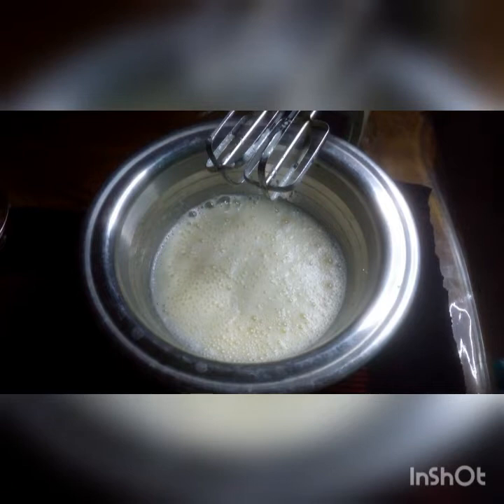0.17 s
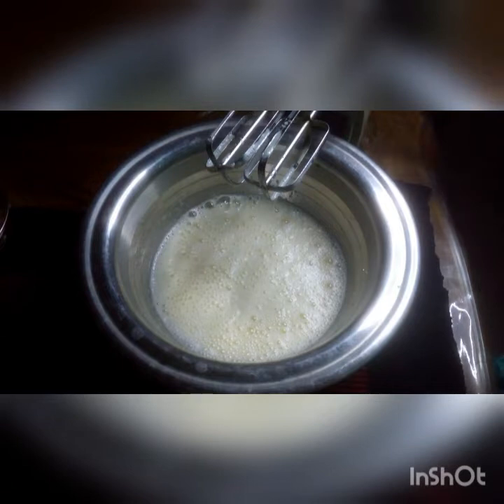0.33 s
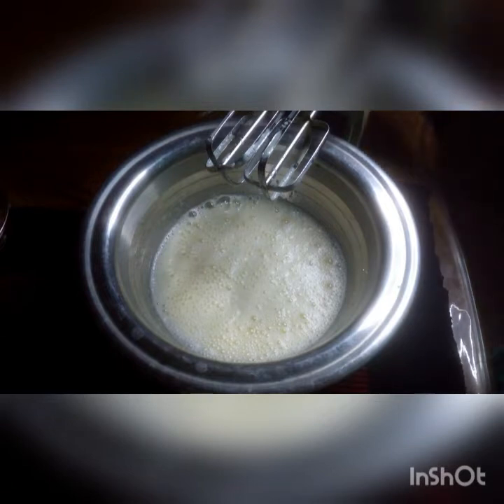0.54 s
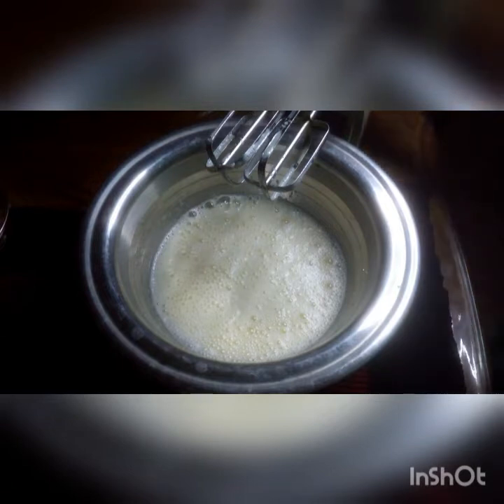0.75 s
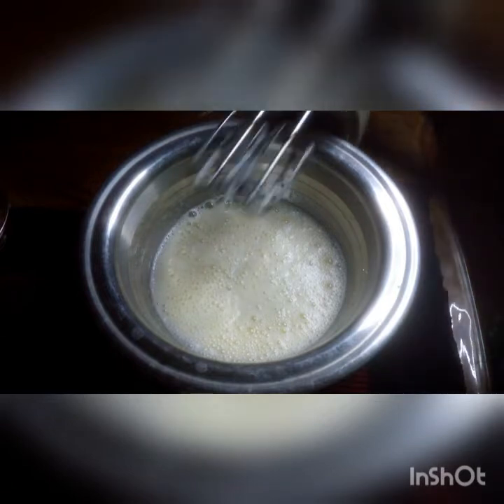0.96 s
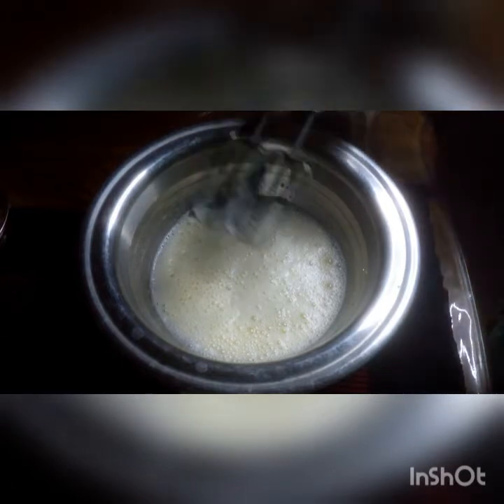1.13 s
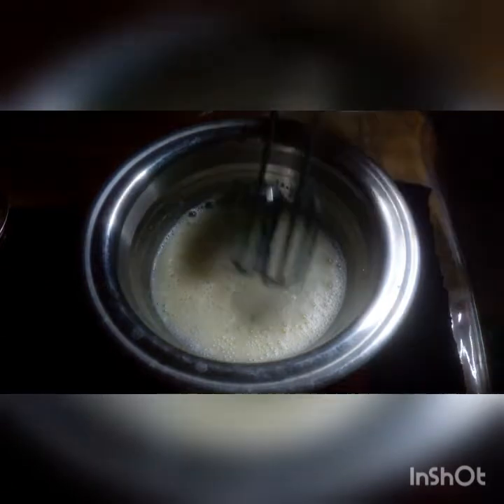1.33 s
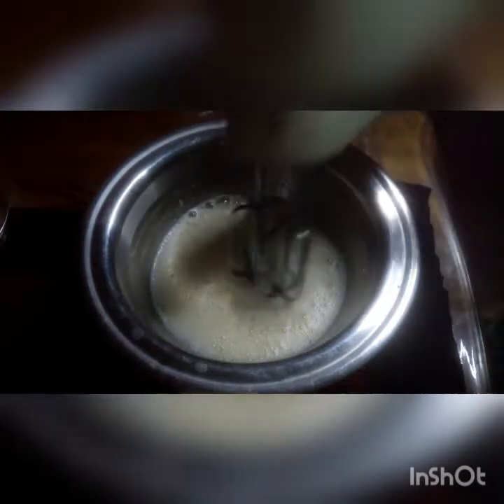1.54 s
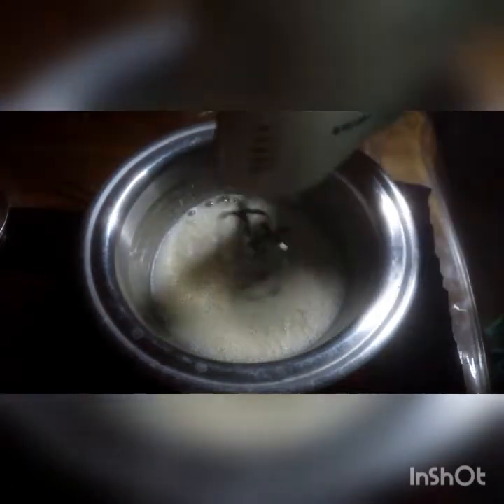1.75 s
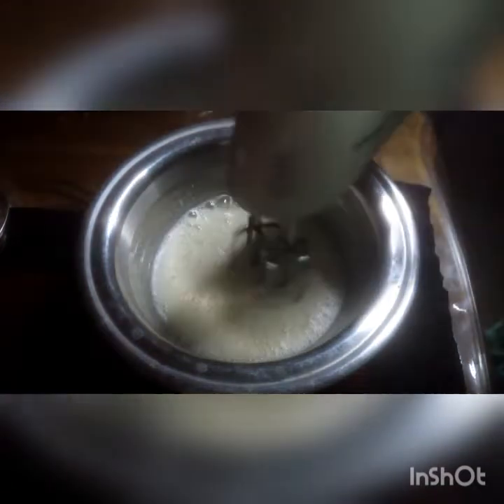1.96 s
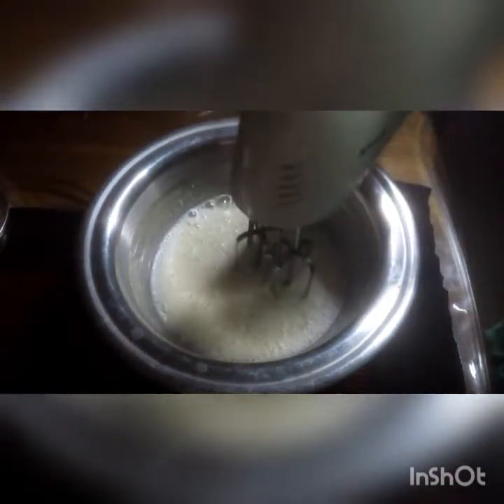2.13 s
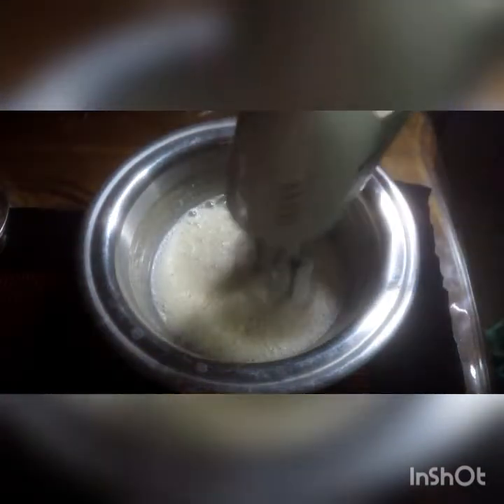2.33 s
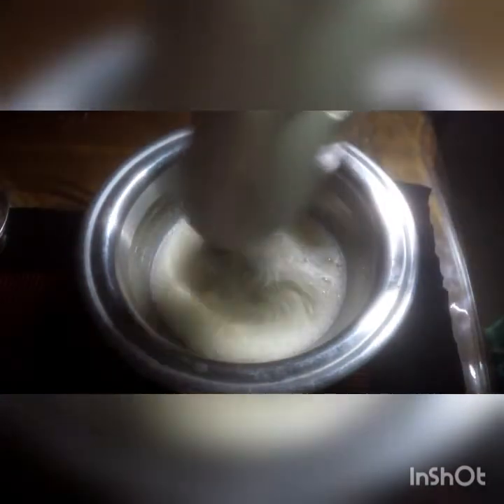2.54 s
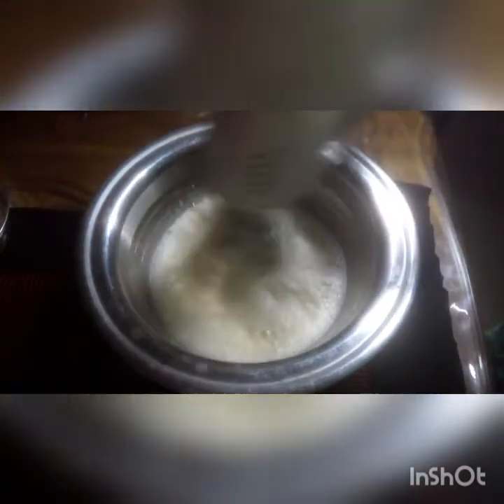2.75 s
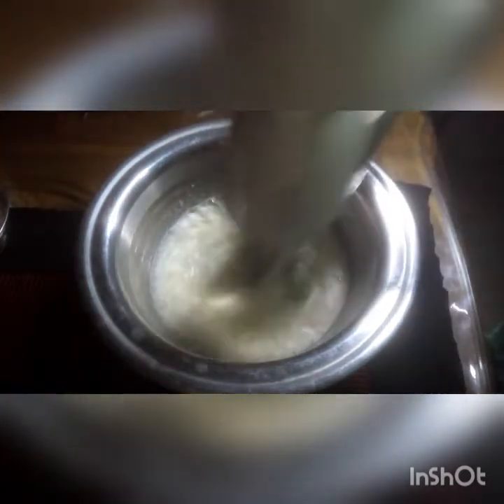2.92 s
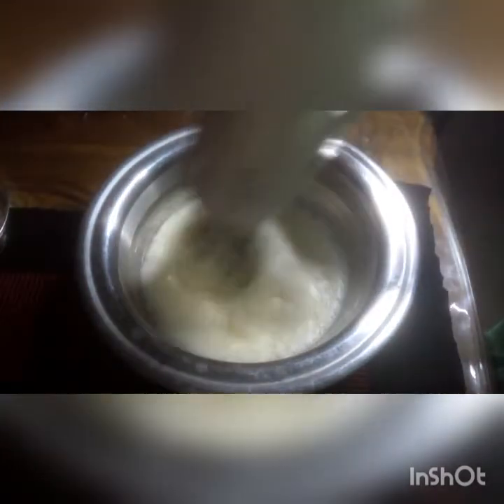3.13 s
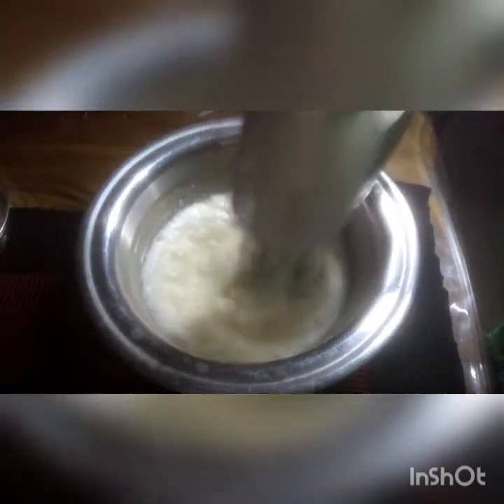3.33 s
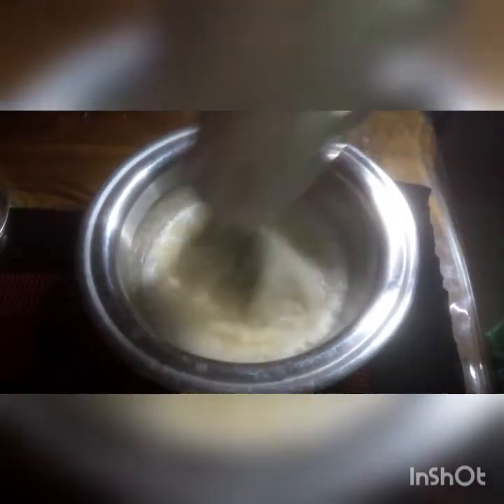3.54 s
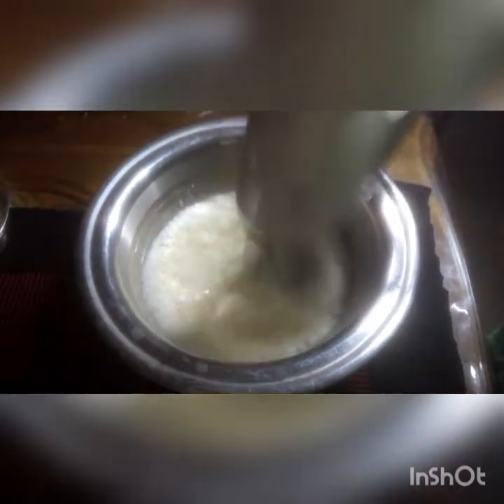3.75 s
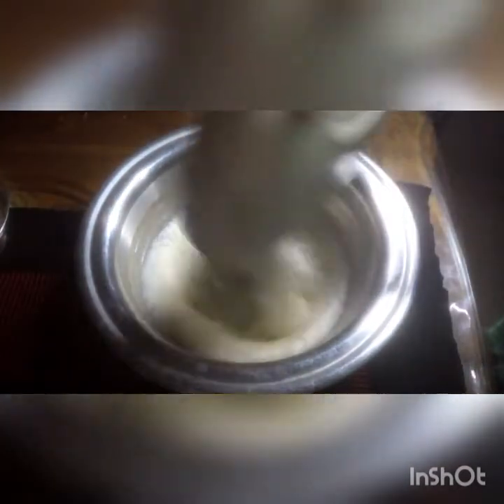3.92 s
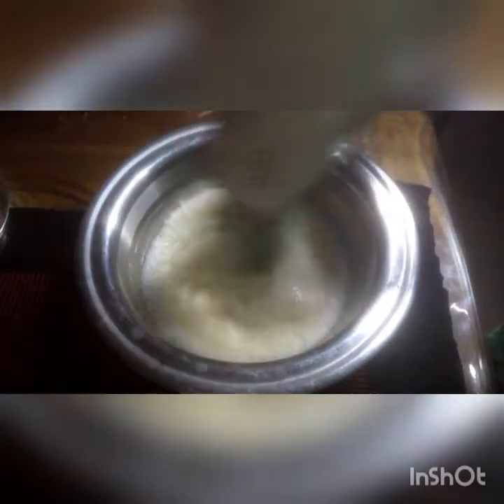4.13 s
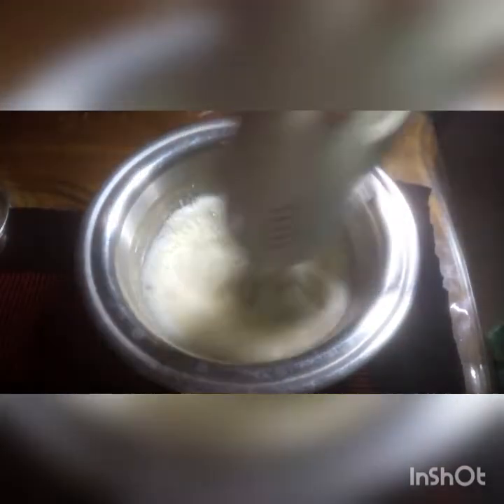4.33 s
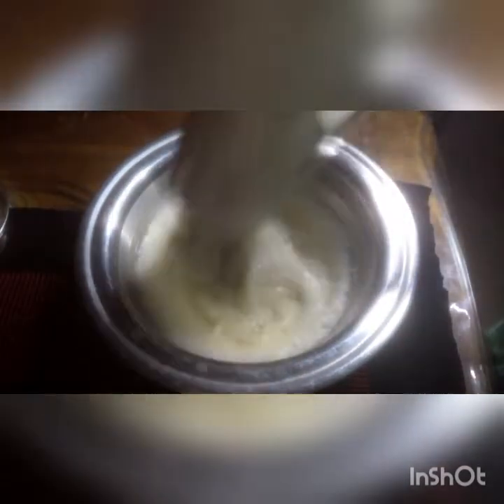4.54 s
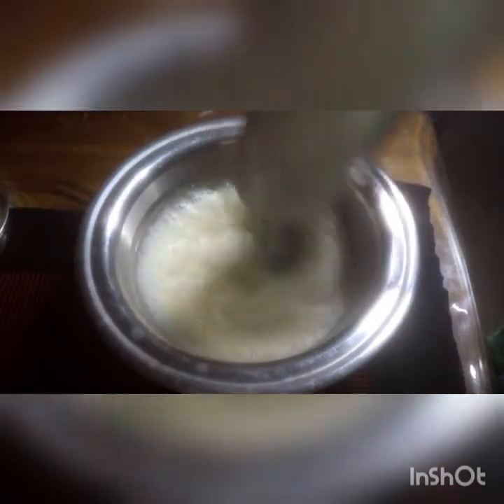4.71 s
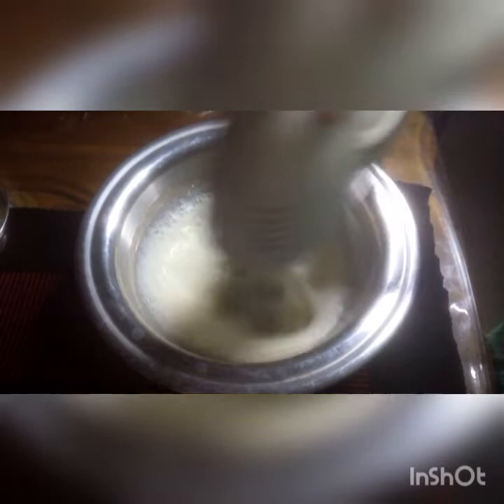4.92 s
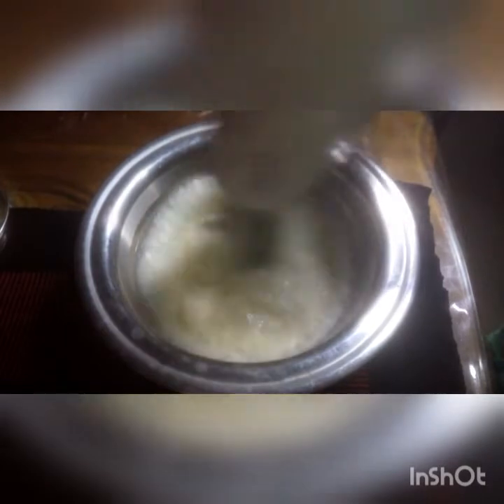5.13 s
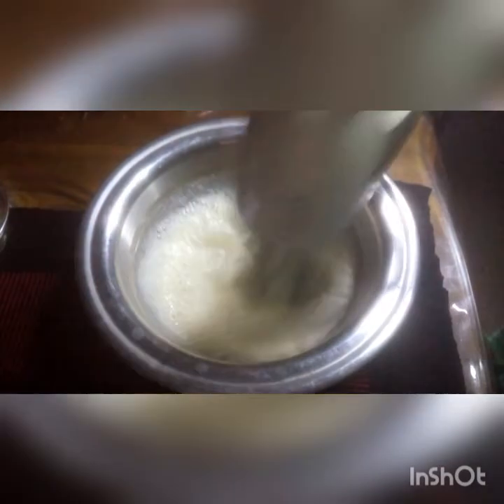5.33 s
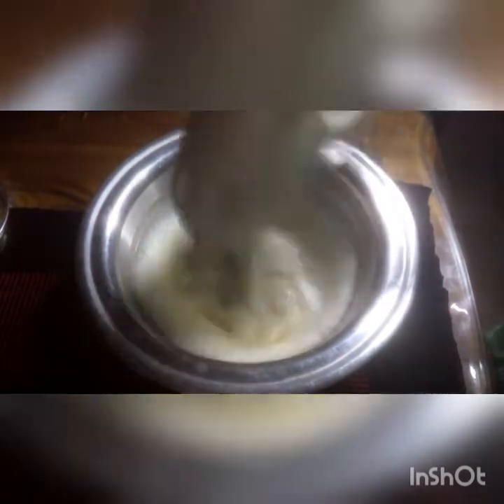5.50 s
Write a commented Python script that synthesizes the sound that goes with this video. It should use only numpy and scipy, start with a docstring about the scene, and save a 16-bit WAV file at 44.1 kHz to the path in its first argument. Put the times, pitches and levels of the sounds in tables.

```python
"""An electric hand mixer in a small kitchen. Its plastic body clicks in the hand, the beaters knock on a
steel bowl, the switch tocks, then the motor starts with a jolt and winds up to speed. The shaft hums,
fan blades and commutator whine, the gears rattle in the housing and the beaters churn a runny mixture.
Tones are multiples of the shaft speed, blows ring damped modes, rattle and churn are shaped noise."""
import sys
import numpy as np
from scipy import signal
from scipy.fft import rfft, irfft, next_fast_len
from scipy.io import wavfile
from scipy.ndimage import map_coordinates

SR = 44100
rng = np.random.default_rng(int(sys.argv[2]) if len(sys.argv) > 2 else 0)


def digitize_waveform(pressure):
    """Quantize a signal to 16-bit integers and store it at the path in sys.argv[1].

    Rows of a 2-D input are taken as channels; values are limited to [-1, 1].
    """
    field = np.atleast_2d(pressure).T
    bounded = np.clip(field, -1, 1)
    quanta = np.round(bounded * 32767).astype(np.int16)
    wavfile.write(sys.argv[1], SR, quanta)


N = 245637
T = np.arange(N) / SR
START_S, FULL_SPEED_HZ, MAINS_HZ = 2.28, 355.8, 50
STIR_HZ, DEEPEST_S = 2.37, 4.1  # hand circling the bowl; beaters deepest in the mixture
# (gain at full speed [dB], gain per doubling of speed [dB], stirring sway [dB])
COMMUTATOR_LAW, AIR_LAW, CHURN_LAW = (-30.5, -1.5, 2.8), (-28.5, 18.7, 0.13), (-36, 5.8, 0.67)

# Noise spectra (frequency [Hz], level [dB])
ROOM_SPECTRUM = [(15, -45), (25, -24), (103, -20), (167, 4), (301, -9), (394, -17), (438, -14), (952, -24),
                 (1030, -22.5), (2130, -26), (5720, -30), (7890, -39.5), (15000, -46)]
CLATTER_SPECTRUM = [(100, -56), (230, -6), (480, -4), (760, -1), (930, -5.5), (1300, -3.5), (1900, -1),
                    (2300, -3), (3300, -10.5), (4500, -83), (8000, -64)]
AIR_SPECTRUM = [(1500, -2), (3300, 3.5), (4600, 2), (5600, 1.5), (6450, -1), (7100, -9.5), (8200, -18),
                (9700, -22.5), (10600, -23.5), (12500, -19), (15300, -25)]
CHURN_SPECTRUM = [(45, -40), (80, -12), (125, -0.5), (180, 4), (260, 4.5), (500, 1.5), (2000, -35.5)]
# Low swells (time [s], half length [s], level [dB], pitch [Hz])
RUMBLE_SWELLS = [(0.066, 0.077, -59, 183.6), (0.25, 0.037, -53, 167), (0.353, 0.09, -50.5, 162),
                 (0.782, 0.061, -50, 170), (.93, 0.12, -56.5, 167), (1.613, 0.038, -52, 190),
                 (2.042, 0.099, -49.5, 112)]
# Noise swells (time [s], half length [s], level [dB])
RUSTLE_SWELLS = [(.29, 0.16, -62.5), (.71, 0.031, -60.5), (.78, 0.069, -61.5), (1.56, 0.092, -61.5),
                 (1.72, 0.086, -60), (2.1, 0.21, -60.5)]
WHISTLE_SWELLS = [(1.34, 0.115, -67), (1.84, 0.15, -72.5)]
SLOSH_SWELLS = [(2.68, 0.022, -46), (2.766, 0.016, -52), (3.303, 0.081, -52), (4.054, 0.054, -38),
                (4.314, 0.045, -36.5), (5.039, 0.038, -34.5), (5.153, 0.045, -35.5), (5.508, 0.056, -39.5)]
# Blows (time [s], level [dB], snap [dB], brightness [dB/octave])
BODY_CLICKS = [(0.0595, -29, -45, -3), (0.184, -40, -3, -1), (0.277, -44.5, 7, 1),
               (0.304, -44.5, -19, -4.5), (2.143, -38, -24, -4.5)]
BOWL_KNOCKS = [(1.887, -51, -28, -8), (1.931, -37, -30, 1), (1.9425, -24, -21, 0), (2.033, -32.5, -25, 0.5),
               (2.051, -39, -22, -3), (2.172, -44, -25, -1)]
SWITCH_TOCKS = [(2.247, -36, -29, 1)]
GEAR_JOLTS = [(2.2705, -31, 0, 11), (2.287, -25, -20, 2), (2.301, -18, -8, 1), (2.3045, -28, -7, 0.5),
              (2.3095, -10, -14, -2), (3.06, -17, -19, 6.5), (3.317, -18, -10, -14), (3.70, -18, -19, 6),
              (3.963, -21, -11, 7), (4.067, -14, -16, 7), (4.205, -31, -14, 9), (4.227, -16, -11, 6.5),
              (4.401, -19, -2, 1), (4.5, -23, -16, -3), (4.593, -17, -7, 4), (4.632, -11, -11, 6),
              (5.026, -15, -12, 0), (5.129, -13, -14, 3), (5.257, -12.5, -10, 3)]
# Modes of the struck parts (frequency [Hz], level [dB], t60 [s])
PLASTIC_MODES = [(498, -7.5, 0.11), (830, -4, 0.1), (910, -16, 0.5), (1330, 11.5, 0.046),
                 (1490, -5.5, 0.41), (1690, -14, 0.45), (1880, -7, 0.34), (2275, 10, 0.029),
                 (2430, -2.5, 0.37), (2910, 2.5, .05), (3270, 8.5, 0.11), (3620, 10.5, 0.031),
                 (4230, 2, 0.12), (4600, -5, .18), (5030, -22, .1), (5720, -2, .07), (6440, -3, 0.054),
                 (6800, -34, .05), (10300, -35, .14)]
STEEL_MODES = [(547.7, -14.5, 0.62), (696, -19, 0.3), (730, 10.5, 0.017), (1045, -16, .17),
               (1180, -4, 0.023), (1500, -29, 0.2), (1740, -15, 0.046), (2180, -21, 0.26),
               (2172, -23, 0.45), (3280, -38, 0.8), (5000, -26, .15), (5600, -15, 0.04)]
SWITCH_MODES = [(500, -25, .02), (830, 0, 0.03), (960, -5, .025), (1400, -26, .02), (5700, -26, .02)]
GEARBOX_MODES = [(538, -12.5, 0.16), (663, 4, 0.058), (1200, -5.5, 0.059), (1410, 2, 0.0095),
                 (2637, -23, 0.16), (4600, -14.5, 0.011), (5970, -51, 0.017)]
# Wind-up: quick surge, slow creep (speed gained [Hz], time constant [s])
WIND_UP_STAGES = [(150, .122), (174.9, .63)]
# Drag of the mixture (time [s], half length [s], speed lost [Hz])
LOAD_SAGS = [(3.046, .07, 1.17), (3.495, 0.061, 1.42), (4.042, 0.06, 4.4), (4.568, 0.11, 1.82),
             (5.071, 0.092, 2.13), (5.544, 0.074, 1.84)]
# Mains harmonics in the stator (frequency [Hz], level [dB])
INRUSH_PARTIALS = [(200, -40), (300, -38.5)]
# Envelopes of the running parts (time [s], level [dB])
HUM_ENVELOPE = [(2.42, -58), (2.46, -42), (2.49, -37), (2.6, -41), (2.65, -30.5), (2.75, -30.5),
                (2.81, -32.5), (2.88, -29.5), (3.03, -25), (3.17, -35.5), (3.26, -26), (3.39, -30),
                (3.47, -42), (3.56, -32), (3.62, -31), (3.78, -28.5), (3.88, -38), (4.0, -36.5),
                (4.4, -30.5), (4.48, -41), (4.55, -32), (4.62, -37), (4.68, -25.5), (4.77, -42),
                (4.82, -34), (5.04, -46), (5.11, -33.5), (5.3, -31), (5.37, -46), (5.44, -46), (5.57, -32)]
FAN_ENVELOPE = [(2.38, -41), (2.6, -42), (2.68, -33), (2.81, -29), (2.94, -32), (3.0, -36), (3.13, -37),
                (3.22, -30), (3.33, -34), (3.43, -26), (3.77, -27), (3.92, -31), (4.05, -36), (4.14, -36),
                (4.2, -25), (4.29, -27.5), (4.37, -31), (4.43, -32.5), (4.66, -31), (4.73, -31),
                (4.82, -42), (4.97, -30), (5.05, -39), (5.2, -31), (5.57, -54)]
RATTLE_ENVELOPE = [(2.37, -42), (2.54, -30), (2.62, -29), (3.34, -24), (3.44, -25.5), (3.7, -23),
                   (3.85, -26), (3.89, -23), (4.02, -24.5), (4.14, -26.5), (4.22, -23.5), (4.37, -25),
                   (4.39, -26.5), (4.41, -23), (4.8, -24.5), (4.92, -23), (5.36, -24.5), (5.57, -23)]
# Housing's radiation of the commutator tone and its overtone (frequency [Hz], gain [dB])
COMMUTATOR_RADIATION = [(1300, -11), (1700, -22), (2100, -7), (2400, -13), (2600, 7), (2930, -2.5),
                        (3120, 1.5), (3300, -9), (3550, -12), (4100, -16), (4240, -10)]
OVERTONE_RADIATION = [(3400, -66), (4200, -49), (4800, -49), (5150, -45), (5450, -47), (5800, -60),
                      (6100, -47), (6700, -53), (7100, -55), (7450, -69)]
# Housing and bowl under load (frequency [Hz], width [Hz], level [dB])
LOADED_RESONANCES = [(158, 9, -1.5), (307.2, 16, 2), (358, 17, 1), (441.4, 23, 0.5), (552, 18, 5),
                     (639, 12, 9.5), (690.4, 7.6, 1.5), (1071, 9.9, 3), (1109, 64, 5.5), (1200, 92, -12),
                     (1440, 23, 0), (2570, 99, 3.5), (3013, 30, 5.5), (3690, 14, -15), (6000, 16, -36)]
# Likeness of the two sides (frequency [Hz], coherence [0-1])
COHERENCE = [(60, 1), (300, 0.63), (640, 0.79), (1400, 0.74), (3000, 0.27), (6500, 0.013)]
# Shading of the right side (frequency [Hz], left minus right [dB])
SIDE_TILT = [(60, 0.6), (110, 1.0), (200, 1.6), (380, 0.3), (690, 2.5), (1280, 2.4), (2360, 7), (4350, 9.0),
             (8020, 11.0), (14800, 15.4)]


def undb(db):
    """Decibels to gain."""
    return 10 ** (np.asarray(db) / 20)


def unit(x):
    """Scale to rms 1."""
    return x / np.sqrt(np.mean(x ** 2))


def over_hz(points, size=N):
    """Interpolate (frequency [Hz], value) points at the FFT bins."""
    hz, value = np.transpose(points)
    return np.interp(np.log(np.fft.rfftfreq(size, 1 / SR) + 1), np.log(hz + 1), value)


def colour(x, spectrum):
    """Filter by (frequency [Hz], level [dB]) points; scale to rms 1."""
    size = x.shape[-1]
    return unit(irfft(rfft(x) * undb(over_hz(spectrum, size)), size))


def resonate(x, modes):
    """Parallel resonators (frequency [Hz], width [Hz], level [dB])."""
    f = np.fft.rfftfreq(N, 1 / SR) + 1e-3
    response = sum(undb(db) / (1 + 1j * (f * f - hz * hz) / (f * width)) for hz, width, db in modes)
    return irfft(rfft(x) * response, N)


def walk(rate_hz):
    """Smooth random drift, rms 1."""
    size = next_fast_len(N, real=True)
    f = np.fft.rfftfreq(size, 1 / SR)
    spectrum = rfft(rng.standard_normal(size)) * np.exp(-(f / rate_hz) ** 2) * (f > .5)
    return unit(irfft(spectrum, size)[:N])


def noise():
    """Two independent white noises."""
    return rng.standard_normal((2, N))


def grains(per_s, scatter_db):
    """Two streams of tiny random impacts."""
    return unit((rng.random((2, N)) < per_s / SR) * np.sign(noise()) * undb(scatter_db * noise()))


def spread(pair):
    """Independent pair to stereo: alike in the bass, unrelated in the treble."""
    coherence = np.clip(over_hz(COHERENCE), 0, .99)
    mid, side = rfft(pair) * np.sqrt([1 + coherence, 1 - coherence])
    return irfft(np.array([mid + side, mid - side]), N)


def pan(x, left_db):
    """Lean a stereo sound left."""
    return x * undb(np.array([[left_db], [-left_db]]) / 2)


def detune(pair, share):
    """Drift all pitches together by a small share."""
    position = np.cumsum(1 + share * walk(4.02))
    return np.array([map_coordinates(x, [position], mode="mirror") for x in pair])


def gain_at(x, curve):
    """Gain along an (x, level [dB]) curve."""
    return undb(np.interp(x, *np.transpose(curve)))


def swell(at_s, half_s, order=2):
    """Bell envelope; a higher order flattens the top."""
    return np.exp(-((T - at_s) / half_s) ** order)


def swells(table, order=2):
    """Summed gain of a table of swells."""
    return sum(undb(db) * swell(at_s, half_s, order) for at_s, half_s, db in table)


def strikes(blows, modes, crack_db, crack_s, snap_hz, room_db, room_t60_s):
    """Each blow rings the modes, with a short crack and a contact snap; the kitchen reverberates."""
    out, t = np.zeros((2, N)), T[:SR // 2]
    snap_spectrum = [(snap_hz / 2, 0), (snap_hz, -5), (1.74 * snap_hz, -28), (2 * snap_hz, -48)]
    attack = 1 - np.exp(-(t / .0002) ** 2)
    highpass = signal.butter(2, 220, "high", fs=SR, output="sos")  # each blow is cut below about 220 Hz
    for at_s, db, snap_db, db_per_octave in blows:
        struck = [(hz, mode_db + db_per_octave * np.log2(hz / 1000), t60) for hz, mode_db, t60 in modes]
        ring = sum(undb(mode_db - 60 * t / t60) * np.sin(2 * np.pi * hz * t + rng.uniform(0, 2 * np.pi))
                   for hz, mode_db, t60 in struck)
        crack_spectrum = [(100, -56)] + [mode[:2] for mode in struck] + [(11000, -52)]
        crack = colour(rng.standard_normal(len(t)), crack_spectrum) * np.exp(-t / crack_s)
        snap = colour(rng.standard_normal((2, len(t))), snap_spectrum) * np.exp(-t / .0067) / 2
        hit = ring / np.abs(ring).max() + undb(crack_db) * crack + undb(snap_db) * snap
        hit = signal.sosfilt(highpass, hit * attack)
        start = int(at_s * SR)
        out[:, start:start + len(t)] += undb(db) * hit[:, :N - start] / np.abs(hit).max()
    tail = colour(rng.standard_normal((2, len(t))), [(300, 4), (5000, -15), (12000, -23)])
    tail = unit(tail * undb(-60 * t / room_t60_s) * (t > .004)) / np.sqrt(len(t))
    return out + undb(room_db) * signal.fftconvolve(out, tail, axes=1)[:, :N]


def room_tone():
    """Steady hiss and a low rumble with narrow-band swells."""
    hiss = undb(-60) * colour(spread(noise()), ROOM_SPECTRUM)
    drone = resonate(spread(noise()), [(68, 14, -7.5), (110, 15, -2), (171, 15, 0), (220, 30, -5.5)])
    rumble = undb(-58) * colour(drone, [(40, -5), (100, 3), (260, -7.5), (700, -11), (6000, -23)])
    for at_s, half_s, db, hz in RUMBLE_SWELLS:
        band = [(hz, 42, 0)]
        boom = unit(resonate(resonate(rng.standard_normal(N), band), band))
        rumble += undb(db) * swell(at_s, half_s) * boom
    return hiss + rumble


def body_clicks():
    """The plastic body clicks in the hand."""
    return strikes(BODY_CLICKS, PLASTIC_MODES, crack_db=-3, crack_s=.005, snap_hz=12000,
                   room_db=-6.5, room_t60_s=.42)


def handling():
    """Rustles as the mixer is gripped and lowered; a soft bump as it is picked up."""
    rustle_spectrum = [(150, -28), (350, 11), (800, 7.5), (1600, 5.5), (3500, 1.5), (6000, -.5),
                       (8000, -38)]
    rustle = colour(spread(noise()), rustle_spectrum)
    bump = colour(spread(noise()), [(100, -18), (200, -2), (380, 3), (550, -22), (1500, -46)])
    return swells(RUSTLE_SWELLS) * rustle + undb(-57) * swell(at_s=.357, half_s=.054) * bump


def whistle():
    """A faint, thin whistle of narrow-band noise."""
    band = colour(noise(), [(5400, -70), (5730, 0), (5860, 0), (6200, -70)])
    return swells(WHISTLE_SWELLS, order=8) * band


def bowl_knocks():
    """The beaters ring the steel bowl."""
    return strikes(BOWL_KNOCKS, STEEL_MODES, crack_db=-9, crack_s=.0032, snap_hz=5550,
                   room_db=-15, room_t60_s=.63)


def switch_tock():
    """The slide switch resists the thumb with a dull tock."""
    return strikes(SWITCH_TOCKS, SWITCH_MODES, crack_db=-20, crack_s=.004, snap_hz=5500,
                   room_db=-5, room_t60_s=.4)


def gear_jolts():
    """The switch closes, the gears take up their play, then the beaters catch now and then."""
    return strikes(GEAR_JOLTS, GEARBOX_MODES, crack_db=-10.5, crack_s=.0089, snap_hz=6150,
                   room_db=-11, room_t60_s=.68)


def start_decay(tau_s):
    """1 until the motor starts, then an exponential fall."""
    return np.exp(-np.maximum(T - START_S, 0) / tau_s)


def shaft_speed_hz():
    """The motor winds up and sags under load."""
    sag_hz = sum(hz * swell(at_s, half_s) for at_s, half_s, hz in LOAD_SAGS)
    return FULL_SPEED_HZ - sum(hz * start_decay(tau_s) for hz, tau_s in WIND_UP_STAGES) - sag_hz


def drive(speed_hz, law):
    """Gain that follows shaft speed and sways as the hand circles the bowl."""
    full_db, doubling_db, stir_db = law
    circle_size = np.clip((T - START_S) / 2, 0, 1)
    depth = circle_size * np.cos(2 * np.pi * STIR_HZ * (T - DEEPEST_S))
    return undb(full_db + doubling_db * np.log2(speed_hz / FULL_SPEED_HZ) + stir_db * depth)


def tone(turns, order, wander_rad, flutter):
    """A multiple of shaft speed, shaken in phase and strength, a little differently on each side."""
    common, apart = (walk(87) + 1j * walk(250) for _ in range(2))
    shake = common + .7 * np.array([[1], [-1]]) * apart
    carrier = np.exp(1j * (2 * np.pi * order * turns + wander_rad * walk(34.5)))
    return unit(np.real(carrier * (1 + flutter * shake)))


def stator_buzz():
    """Inrush current buzzes the stator, then dies away."""
    buzz = sum(undb(db) * np.sin(2 * np.pi * hz * T) for hz, db in INRUSH_PARTIALS)
    return start_decay(tau_s=.22) * buzz


def shaft_hum(turns):
    """Unbalance hums once per turn, with a second harmonic."""
    fundamental = tone(turns, order=1, wander_rad=.15, flutter=.11)
    second = tone(turns, order=2, wander_rad=.3, flutter=.3)
    return gain_at(T, HUM_ENVELOPE) * (fundamental + undb(-20) * second)


def fan_whine(speed_hz, turns):
    """Nine blades whine; near full speed a hoarse band grows just below their tone."""
    blades = tone(turns, order=9, wander_rad=.3, flutter=.25)
    hoarse = tone(turns, order=8.87, wander_rad=2.5, flutter=1.5)
    return gain_at(T, FAN_ENVELOPE) * blades + undb(-29) * (speed_hz / FULL_SPEED_HZ) ** 24 * hoarse


def commutator_whine(speed_hz, turns):
    """Twelve bars whine through the housing, throbbing at twice the mains frequency."""
    bars = tone(turns, order=12, wander_rad=.15, flutter=.2)
    bars *= gain_at(12 * speed_hz, COMMUTATOR_RADIATION) * drive(speed_hz, COMMUTATOR_LAW)
    overtone = tone(turns, order=24, wander_rad=1.8, flutter=.55)
    overtone *= gain_at(24 * speed_hz, OVERTONE_RADIATION)
    throb = 1 + .7 * np.cos(2 * np.pi * 2 * MAINS_HZ * T)
    return (bars + overtone) * throb


def gear_rattle(turns, kick):
    """Gear teeth and beater wires rattle the housing and bowl."""
    turns_per_wire = 6.4
    strokes = undb(.12 * np.cos(2 * np.pi * turns / turns_per_wire) + .21 * walk(23))
    ring = resonate(spread(grains(450, scatter_db=0) * strokes), LOADED_RESONANCES)
    ring = colour(ring, [(40, -26), (110, -6), (5700, -5), (8500, -20.5)])
    ring = detune(ring, share=.007)  # the moving mixture shifts the resonances
    impacts = grains(2300, scatter_db=3.5) + .56 * noise()
    clatter = colour(spread(impacts * strokes), CLATTER_SPECTRUM)
    effort = gain_at(T, RATTLE_ENVELOPE) * undb(.12)
    return (effort + kick) * (undb(-.3) * ring + undb(-2.6) * clatter)


def fan_air(speed_hz, kick):
    """The fan blows a grainy, flickering hiss that rises with speed."""
    air = colour(spread(noise() + .28 * grains(2500, scatter_db=-1.5)), AIR_SPECTRUM)
    flicker = undb(1.03 * walk(21))
    return (drive(speed_hz, AIR_LAW) + undb(-2) * kick) * air * flicker


def mixture_churn(speed_hz):
    """The mixture churns and sloshes up round the beaters."""
    churn = colour(spread(noise()), CHURN_SPECTRUM) * undb(2.8 * walk(4.9))
    return (drive(speed_hz, CHURN_LAW) + swells(SLOSH_SWELLS)) * churn


def scene():
    """Handling noises, the starting jolt, then the running mixer."""
    blows = pan(body_clicks(), left_db=5.5) + pan(bowl_knocks() + switch_tock(), left_db=1.5)
    blows += gear_jolts()
    speed_hz = shaft_speed_hz()
    turns = np.cumsum(speed_hz) / SR
    power = np.clip((T - START_S) / .025, 0, 1)
    kick = undb(-29) * start_decay(tau_s=.035)  # starting torque
    motor = stator_buzz() + shaft_hum(turns)
    motor += fan_whine(speed_hz, turns) + commutator_whine(speed_hz, turns)
    beating = gear_rattle(turns, kick) + fan_air(speed_hz, kick) + mixture_churn(speed_hz)
    background = pan(room_tone() + handling() + whistle(), left_db=1.5)
    return background + blows + power * (motor + beating)


def record(dry):
    """The left microphone faces the bowl; the right is shaded in the treble. Steep low-pass on both."""
    size = next_fast_len(2 * N, real=True)
    ratio = undb(over_hz(SIDE_TILT, size))
    side_gains = np.array([ratio, np.ones_like(ratio)]) * 2 / (1 + ratio)
    heard = irfft(rfft(dry, size) * side_gains, size)[:, :N]
    lowpass = signal.ellip(12, .2, 70, 15400, fs=SR, output="sos")
    return signal.sosfilt(lowpass, heard)


dry = scene()
out = record(dry)
digitize_waveform(out)
```